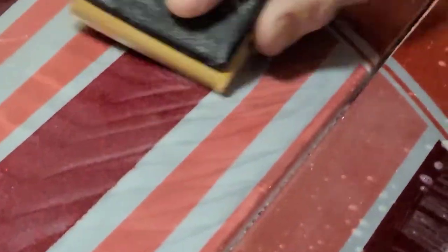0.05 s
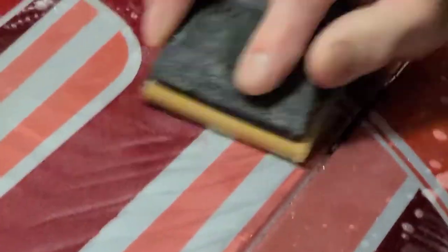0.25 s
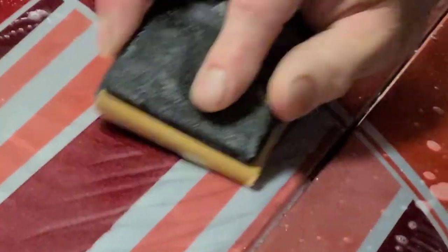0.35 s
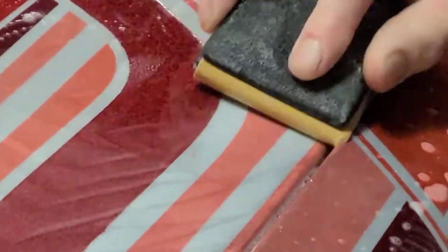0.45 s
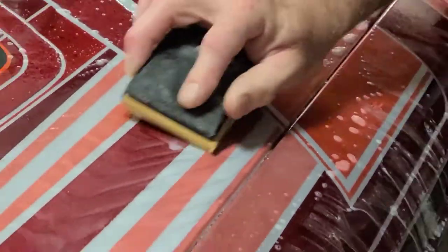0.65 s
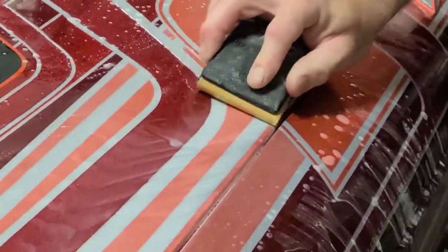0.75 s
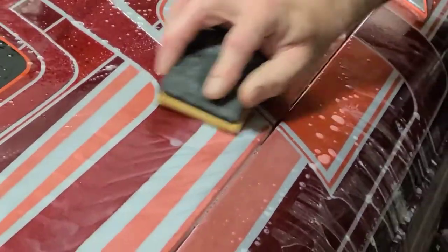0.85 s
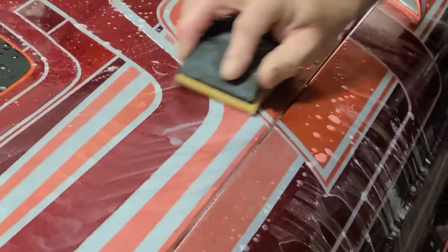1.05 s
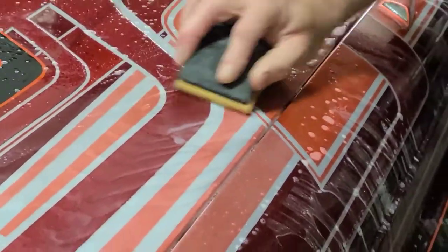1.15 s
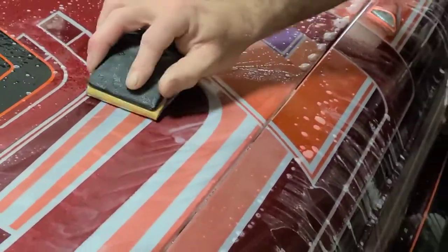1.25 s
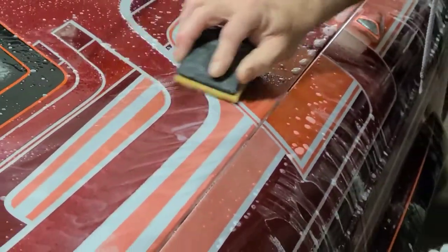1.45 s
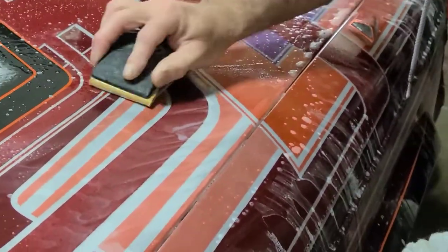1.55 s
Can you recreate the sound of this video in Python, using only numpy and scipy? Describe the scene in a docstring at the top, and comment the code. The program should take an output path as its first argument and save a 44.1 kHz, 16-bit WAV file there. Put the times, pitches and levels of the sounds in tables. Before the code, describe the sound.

A sanding block rubs quickly back and forth over a wet painted panel, knocking once.

```python
"""A sanding block is rubbed to and fro over a wet painted body panel, close by, above a low workshop rumble.
From the start, about six strokes a second, friction makes the grit rasp and the water film hiss,
while the judder of the block forces the hollow panel into a drone. At about 0.25 s the block clicks
and knocks over a seam, and the panel's modes ring out. The strokes go on to the end, with softer thuds
at some of the turns, the last near 1.4 s."""
import sys
import numpy as np
from scipy import signal
from scipy.fft import rfft, irfft, next_fast_len
from scipy.io import wavfile
from scipy.ndimage import map_coordinates

SR = 44100
rng = np.random.default_rng(int(sys.argv[2]) if len(sys.argv) > 2 else 0)


def put_to_file(sound):
    """Save the sound as 16-bit audio at rate SR, in the file named by the first command-line argument."""
    columns = np.atleast_2d(sound).T  # one column per channel
    safe = np.clip(columns, -1, 1)
    whole_steps = np.round(safe * 32767)
    wavfile.write(sys.argv[1], SR, whole_steps.astype(np.int16))


N = 70560
TIME = np.arange(N) / SR

# Noise spectra, each a relative density (f/Hz, level/dB):
RUMBLE_SPECTRUM = [(20, -13), (40, 7), (70, 0), (110, -2), (200, -12.5), (420, -8.5), (560, -20.5),
                   (1000, -13.5), (2000, -17), (8000, -56), (16000, -69)]  # the workshop
BODY_SPECTRUM = [(20, -32), (45, -6.5), (65, -1.5), (95, 1), (130, -4), (180, -11.5), (220, -5.5),
                 (300, -16.5), (420, -17.5), (600, -47), (2000, -74)]  # the shaken hollow panel
THUD_SPECTRUM = [(30, -23), (110, -8), (160, 9), (270, -4), (420, -3.5), (560, -19), (750, -42),
                 (1100, -50), (3000, -90)]  # the unpitched part of a knock
CRACK_SPECTRUM = [(600, -18), (1400, 2.5), (3900, -5), (5200, -38), (12000, -40)]  # the unpitched part of a click
RASP_SPECTRUM = [(500, -13), (1500, -12), (2600, -1), (3300, 1), (4800, -0.5), (5400, -1.5), (6600, 0),
                 (8200, -10), (11000, -5), (16000, -40)]  # grit on paint
HISS_SPECTRUM = [(100, -90), (2000, -54), (4500, -39), (7000, -16), (9000, -11.5), (10000, -1.5),
                 (11200, 1.5), (12400, 1), (14000, 1.5), (15600, 0.5)]  # the water film
SCRAPE_SPECTRUM = [(200, -34), (400, -3.5), (600, -8.5), (880, -4), (1150, -1), (1450, 1), (1900, 4.5),
                   (2600, -2.5), (4000, -2.5), (9000, -71)]  # the panel's broad response to friction
# Envelope of the panel's drone (t/s, level/dB)
DRONE_ENVELOPE = [(0.0, -43.5), (0.08, -55.5), (0.14, -43.5), (0.2, -48.5), (0.29, -38.5), (0.42, -42.5),
                  (0.51, -52.5), (0.698, -66), (0.735, -48.5), (0.776, -47.5), (0.82, -64), (0.942, -51.5),
                  (0.994, -54.5), (1.055, -44.5), (1.128, -47.5), (1.19, -54), (1.222, -47.5), (1.336, -52),
                  (1.385, -48), (1.6, -52)]
# Low modes of the panel (f/Hz, level/dB, T60/s)
PANEL_MODES = [(67.2, -4, 0.24), (102.3, -2.5, 0.23), (150.3, -1, 0.18), (218.8, -2, 0.18),
               (239.2, -0.5, 0.17), (276, -18, 0.059), (338, -8.5, 0.17), (405.7, 0.5, 0.13),
               (449.7, -9.5, 0.16), (536, -17, 0.095), (643, -17.5, 0.087)]
# Blows of the block on the panel (t/s, level/dB, centre of the excited band f/Hz, its spread/octaves)
KNOCK_EVENTS = [(0.137, -43.5, 122, 0.41), (0.2434, -28.5, 430, .7), (0.2482, -26, 212, 0.84),
                (0.2661, -22, 152, 1.04), (0.314, -40.5, 535, 0.24), (1.065, -42.5, 214, 0.14),
                (1.358, -47, 157, 0.31), (1.381, -43, 98.5, 0.78)]
# Contacts of the block's edge with the seam (t/s, level/dB, f/Hz)
SEAM_CONTACTS = [(0.2466, -29.5, 3070), (0.2514, -28, 2030)]
# Narrow resonances of the panel and of the block (f/Hz, bandwidth/Hz, level/dB)
PANEL_RESONANCES = [(1105, 40, -0.5), (2043, 122, 2), (3077, 190, 0), (3380, 250, -1)]
BLOCK_RESONANCES = [(4044, 150, -3.5), (4530, 600, -3.5), (4907, 95, 1.5)]
# Strokes, each lasting until the next (start t/s, rasp level/dB, its change over the stroke/dB,
# hiss level/dB, its change/dB, scrape level/dB, panel ring level/dB, block ring level/dB,
# opening bite/dB, judder f/Hz, slowing time/s)
STROKE_PLAN = [(-0.02, -50, 4, -50, 9, -52.5, -60, -55.5, -2, 71.55, 0.033),
               (0.135, -50.5, 0, -50.5, 15, -54.5, -58, -61, 2, 69.9, 0.059),
               (0.28, -50, 6, -49, 1, -54.5, -55, -54, -0.5, 68.35, 0.042),
               (0.434, -49, -3.5, -51.5, 1.5, -52, -57, -54.5, -1, 67.7, 0.044),
               (0.587, -52.5, 6.5, -54, 4, -57.5, -59, -60.5, 0.5, 85.3, 0.044),
               (0.733, -51.5, -2.5, -55.5, -7, -54, -56, -57, 0.5, 61.95, 0.04),
               (0.881, -52, 8.5, -51.5, 21, -57.5, -57, -61, 0.5, 86.33, 0.036),
               (1.053, -52, 0, -51.5, 7, -62.5, -56, -64.5, 3.5, 60.4, 0.041),
               (1.208, -52, 4.5, -46, 21, -59.5, -60, -72, 0, 79.3, 0.042),
               (1.373, -51.5, -2, -50, 2, -58.5, -58.5, -70, 2.5, 66.5, 0.03),
               (1.522, -53, 5, -38.5, 33, -64.5, -65.5, -68, 1, 83.8, 0.038)]
# Coherence between the two microphone ports (f/Hz, coherence, limited to 1 in use)
PORT_COHERENCE = [(60, 1), (270, 1), (500, .5), (1200, 0.34), (2000, 0.2), (2700, 0.13), (4000, .5),
                  (5600, 1.8), (7000, 0), (9000, 3), (10500, 1.5), (15000, 1)]
# Level difference between the ports (f/Hz, left minus right level/dB)
PORT_BALANCE = [(400, -0.1), (1500, -1), (2500, 4), (3300, 1), (4300, 4), (5300, 8.5), (6500, 5.5),
                (7300, -1), (8200, -10), (10200, -12.5), (11300, -1), (12400, -1), (14500, 5.5),
                (16000, -5)]
# Phase difference between the ports (f/Hz, lead of the left/rad)
PORT_PHASE = [(200, -0.035), (500, -0.58), (800, -0.34), (1200, 0.85), (2000, 0.22), (3100, -0.53),
              (3900, 1.52), (5000, 1.5), (7000, 1.1), (16000, -0.12)]

LAST_TURN_S, BITE_S = 1.93, 0.09  # end of the final stroke; how long the grit digs in after a turn
GRAINS_PER_S, GRAIN_SPREAD_DB = 3800, 3.5
PATCH_DB, PATCH_HZ, PATCH_S = 2.5, 89.16, 0.0999  # shifting spectral peaks and valleys: depth, width, life
KNOCK_RISE_S, THUD_T60_S, CLICK_T60_S = 0.00086, 0.12, 0.0052
PUSH_DB, PUSH_CYCLES = -1.5, 7.4  # the panel yields to a blow; this swing falls 60 dB in so many cycles
MASS_LOADING = 0.0072  # fraction by which the block's weight detunes the modes from knock to knock
PAD_CUTOFF_HZ = 690  # the block's soft pad dulls a knock's ring above this
BAND_LIMIT_HZ = 15850


def amp(db):
    """Amplitude ratio of a level in decibels."""
    return 10 ** (np.asarray(db) / 20)


def unit_rms(x):
    """Normalisation to an rms of 1."""
    return x / np.sqrt(np.mean(x ** 2) + 1e-20)


def along(points, hz):
    """Interpolation of (f/Hz, value) points on a logarithmic frequency axis."""
    f, values = np.transpose(points)
    return np.interp(np.log(hz + 1), np.log(f + 1), values)


def wobble(knots_per_s):
    """Smooth random fluctuation: a spline through Gaussian values."""
    return map_coordinates(rng.standard_normal(int(N * knots_per_s / SR) + 4), [TIME * knots_per_s])


def noise():
    """Two incoherent white noises."""
    return rng.standard_normal((2, N))


def colour(points):
    """Amplitude response of a (f/Hz, level/dB) table."""
    return lambda hz: amp(along(points, hz))


def resonances(table):
    """Superposition of damped second-order resonators of alternating sign."""
    return lambda f: sum((-1) ** k * amp(db) * 1j * f * width / (f0 * f0 - f * f + 1j * f * width)
                         for k, (f0, width, db) in enumerate(table))


def filtered(x, response):
    """Linear filtering: the spectrum is multiplied by a frequency response."""
    size = next_fast_len(N + SR // 2)
    return irfft(rfft(x, size) * response(np.fft.rfftfreq(size, 1 / SR)), size)[..., :N]


def stereo(pair, response):
    """Partial coherence: two independent signals, filtered, mix as mid and side to an rms of 1."""
    def mid_side(hz):
        angle = np.arccos(np.clip(along(PORT_COHERENCE, hz), -1, 1)) / 2
        return response(hz) * np.array([np.cos(angle), np.sin(angle)])
    mid, side = filtered(pair, mid_side)
    return unit_rms(np.array([mid + side, mid - side]))


def workshop_rumble(level_db=-55):
    """Stationary background noise, densest at low frequencies."""
    return amp(level_db) * stereo(noise(), colour(RUMBLE_SPECTRUM))


def panel_drone(judder_db=-1.5, body_db=-6, wander=0.079):
    """Forced vibration: the block judders at an unsteady rate, new in each stroke, and shakes the panel."""
    level_db = np.interp(TIME, *np.transpose(DRONE_ENVELOPE))
    starts, *_, judder_hz, _ = np.transpose(STROKE_PLAN)
    stroke = np.maximum(np.searchsorted(starts, TIME) - 1, 0)
    hz = judder_hz[stroke] * np.exp(wander * wobble(24.95))
    judder = np.sqrt(2) * np.sin(2 * np.pi * np.cumsum(hz) / SR)
    body = stereo(noise(), colour(BODY_SPECTRUM))
    return amp(level_db) * (amp(judder_db) * judder + amp(body_db) * body)


def panel_knocks(thud_db=-6):
    """Impact excitation: a blow pushes the panel in; modes in one band decay freely over a dull thud."""
    ring, thud = np.zeros((2, N)), np.zeros((2, N))
    mode_hz, mode_db, t60 = np.transpose(PANEL_MODES)[:, :, None]
    for start, db, centre_hz, octaves in KNOCK_EVENTS:
        t = np.maximum(TIME - start, 0)
        rise = 1 - np.exp(-t / KNOCK_RISE_S)
        excitation = lambda f: np.exp(-.5 * (np.log2((f + 1) / centre_hz) / octaves) ** 2)
        loaded_hz = mode_hz * (1 + MASS_LOADING * rng.standard_normal(mode_hz.shape))
        modes = excitation(mode_hz) * amp(mode_db - 60 * t / t60) * np.sin(2 * np.pi * loaded_hz * t)
        port_gains = amp(0.8 * rng.standard_normal((2, len(PANEL_MODES))))
        push = amp(PUSH_DB - 60 * t * centre_hz / PUSH_CYCLES) * np.sin(2 * np.pi * centre_hz * t)
        ring += amp(db) * rise ** 2 * (push + port_gains @ modes)
        band = stereo(noise(), lambda f: colour(THUD_SPECTRUM)(f) * excitation(f))
        thud += amp(db + thud_db - 60 * t / THUD_T60_S) * rise * band
    soft_pad = signal.butter(4, PAD_CUTOFF_HZ, fs=SR, output="sos")
    return signal.sosfilt(soft_pad, ring) + thud


def seam_clicks(crack_db=-5):
    """Contact transients: the block's edge snaps over the seam with a heavily damped ring and a crack."""
    out = np.zeros((2, N))
    for start, db, hz in SEAM_CONTACTS:
        t = np.maximum(TIME - start, 0)
        crack = amp(crack_db) * stereo(noise(), colour(CRACK_SPECTRUM))
        out += (t > 0) * amp(db - 60 * t / CLICK_T60_S) * (np.sin(2 * np.pi * hz * t) + crack)
    return out


def grit(grain_db):
    """Shot noise: countless tiny catches of the abrasive merge, and single larger ones stand out."""
    catches = (rng.random((2, N)) < GRAINS_PER_S / SR) * np.sign(noise())
    sizes = amp(GRAIN_SPREAD_DB * np.minimum(rng.exponential(size=(2, N)), 5))
    return noise() + amp(grain_db) * unit_rms(catches * sizes)


def stroke_gain(levels_db, changes_db, attack_s, turn_db, bites=True):
    """Friction noise follows sliding speed: each stroke speeds up, may bite, slides and slows to a turn."""
    starts, *_, bite_db, _, slowing_s = np.transpose(STROKE_PLAN)
    turns = np.append(starts, LAST_TURN_S)
    k = np.clip(np.searchsorted(turns, TIME) - 1, 0, len(STROKE_PLAN) - 1)
    since, until = TIME - turns[k], turns[k + 1] - TIME
    ease = lambda u: np.sin(np.pi / 2 * np.clip(u, 0, 1)) ** 2
    speed = ease(since / attack_s) * ease(until / slowing_s[k])
    slide_db = levels_db[k] + changes_db[k] * (since / (since + until) - .5)
    digging_db = bites * bite_db[k] * ease(2 * (1 - since / BITE_S))
    resting_db = np.mean(levels_db) + turn_db
    return amp(speed * (slide_db + digging_db) + (1 - speed) * resting_db)


def moving_contact(x):
    """Modal coupling depends on position: dense upper modes come and go, here as random spectral gains."""
    hz, t, spectra = signal.stft(x, SR, nperseg=1024)
    grid = np.meshgrid(hz / PATCH_HZ, t / PATCH_S, indexing="ij")
    patches = map_coordinates(rng.standard_normal((512, 64)), grid, mode="mirror")
    return signal.istft(spectra * amp(PATCH_DB * patches), SR, nperseg=1024)[1][:, :N]


def sanding():
    """Sliding friction: grit rasps, the water film hisses, and panel and block resonate."""
    _, rasp_db, rasp_change, hiss_db, hiss_change, scrape_db, panel_db, block_db, *_ = zip(*STROKE_PLAN)
    rasp_db, hiss_db, scrape_db, panel_db, block_db = np.array(
        [rasp_db, hiss_db, scrape_db, panel_db, block_db])
    rasp = stereo(grit(grain_db=-5), colour(RASP_SPECTRUM))
    rasp *= stroke_gain(rasp_db, np.array(rasp_change), attack_s=0.022, turn_db=-8.5)
    hiss = stereo(grit(grain_db=-8.5), colour(HISS_SPECTRUM))
    hiss *= stroke_gain(hiss_db, np.array(hiss_change), attack_s=0.025, turn_db=-16, bites=False)
    easing_db = np.minimum(rasp_change, 0) - 1.5  # scrape and ringing fade as the push eases
    scrape = stereo(grit(grain_db=1), colour(SCRAPE_SPECTRUM))
    scrape *= stroke_gain(scrape_db, easing_db, attack_s=0.013, turn_db=-3.5)
    panel = stereo(grit(grain_db=-0.5), resonances(PANEL_RESONANCES))
    panel *= stroke_gain(panel_db, easing_db, attack_s=0.013, turn_db=-4.5)
    block = stereo(grit(grain_db=5.5), resonances(BLOCK_RESONANCES))
    block *= stroke_gain(block_db, easing_db, attack_s=0.022, turn_db=-8.5)
    pressure = amp(0.17 * wobble(48.9))
    return pressure * moving_contact(rasp + hiss + scrape + panel + block)


def scene():
    """Superposition of the sanding, the panel's vibration, the seam and the workshop."""
    return sanding() + panel_drone() + panel_knocks() + seam_clicks() + workshop_rumble()


def record(dry):
    """Band-limited stereo pickup: the two microphone ports differ in level and phase with frequency."""
    def ports(hz):
        ratio = amp(along(PORT_BALANCE, hz))
        lead = np.exp(.5j * along(PORT_PHASE, hz))
        constant_power = np.sqrt(2 / (1 + ratio ** 2))
        return np.array([ratio * lead, 1 / lead]) * constant_power * (hz < BAND_LIMIT_HZ)
    return filtered(dry, ports)


dry = scene()
out = record(dry)
put_to_file(out)
```